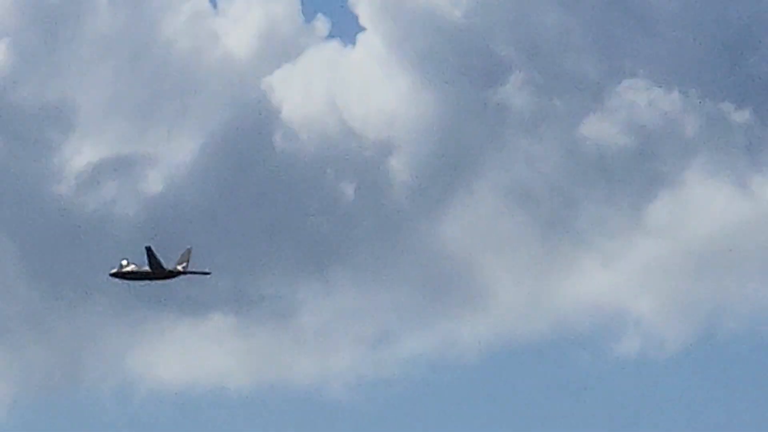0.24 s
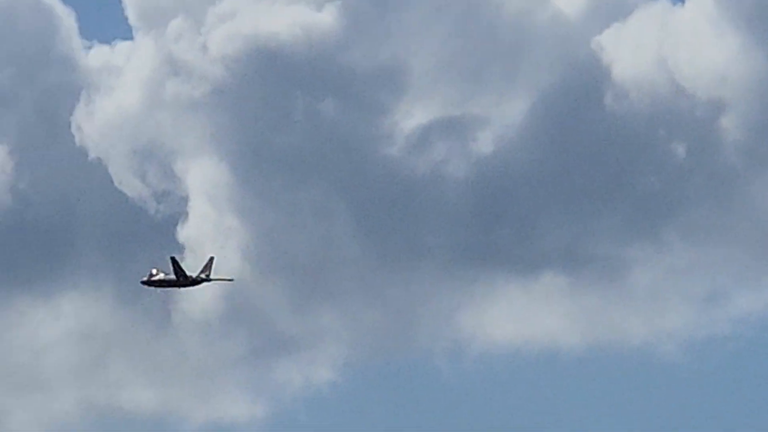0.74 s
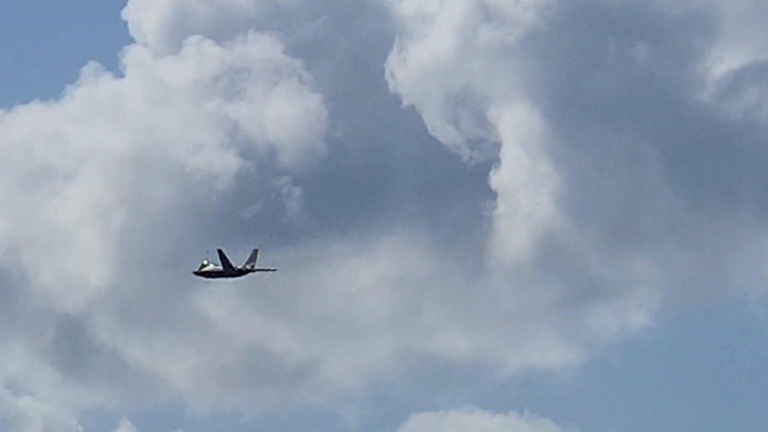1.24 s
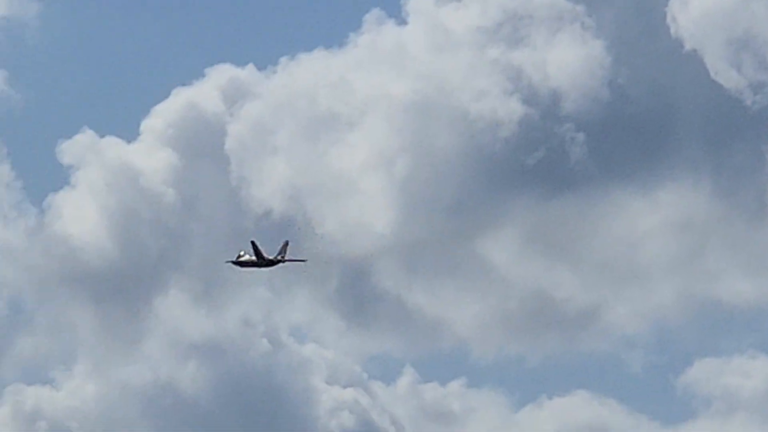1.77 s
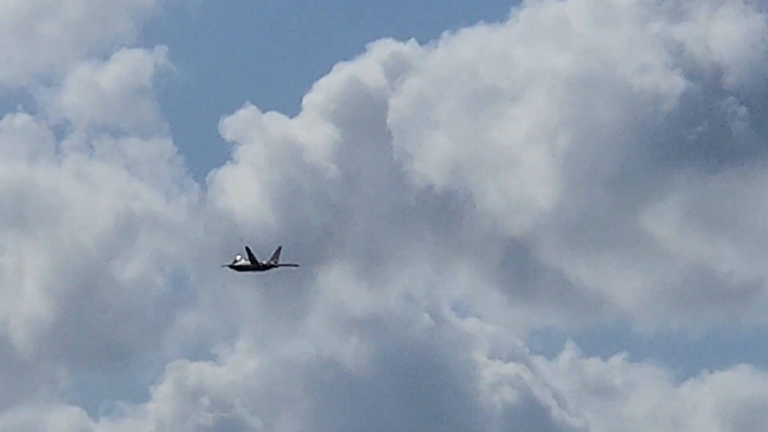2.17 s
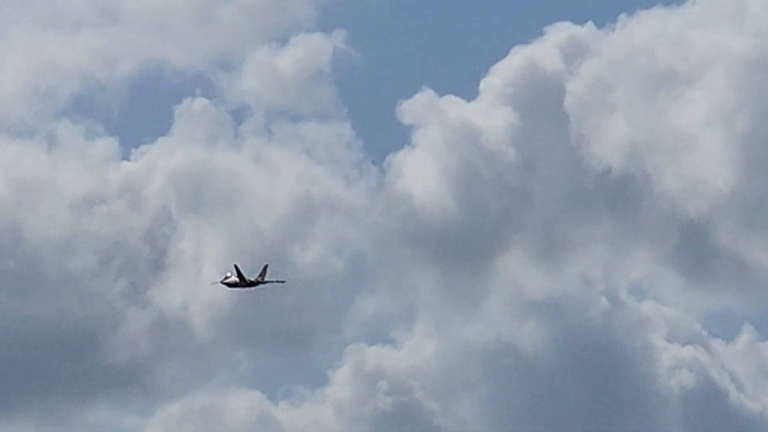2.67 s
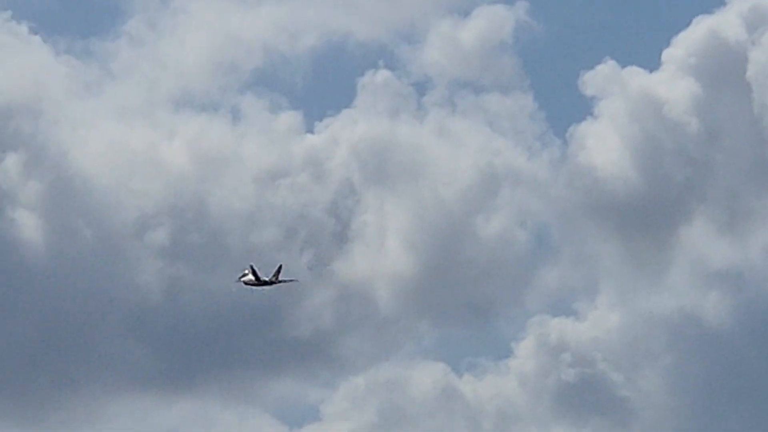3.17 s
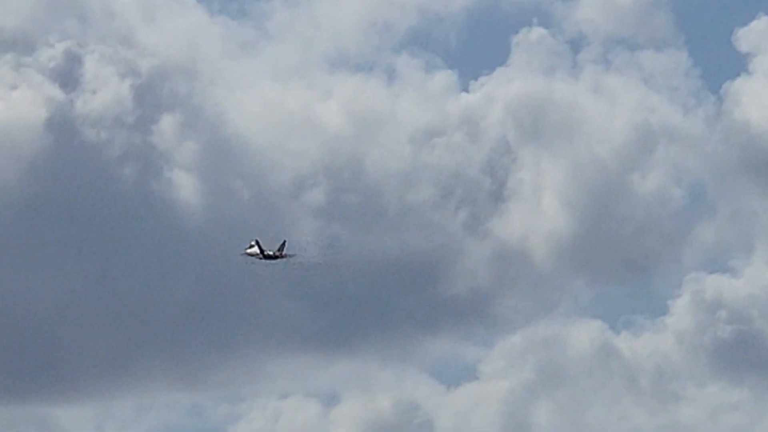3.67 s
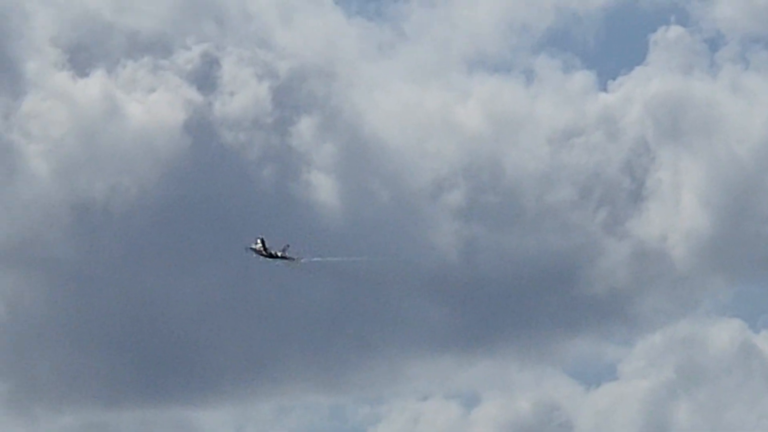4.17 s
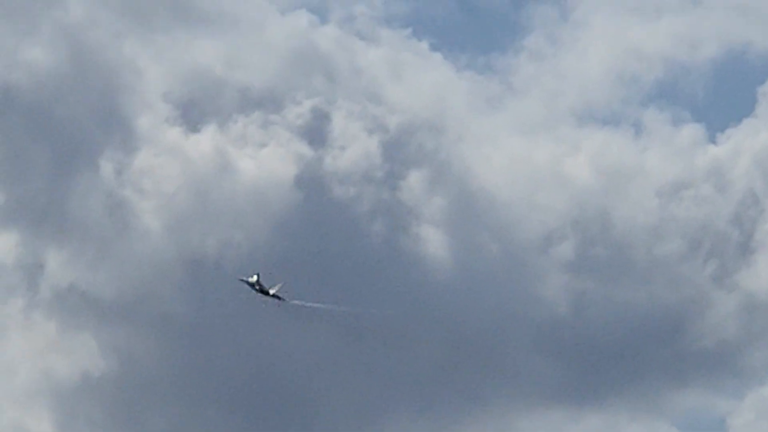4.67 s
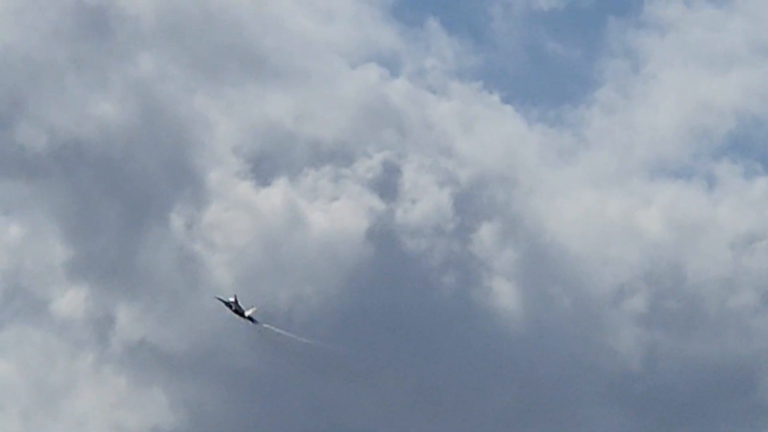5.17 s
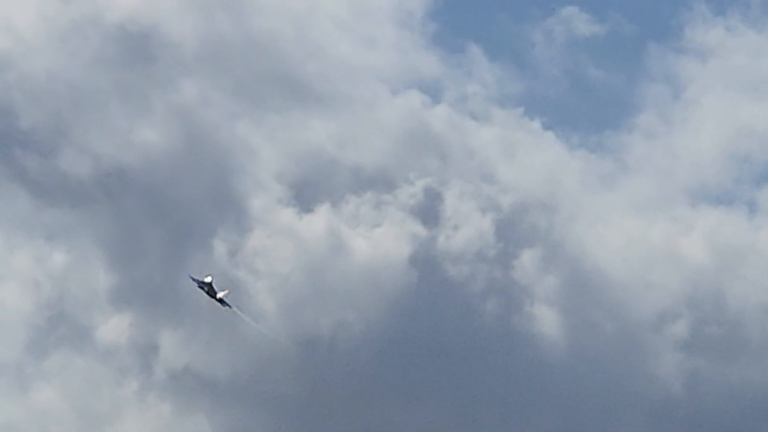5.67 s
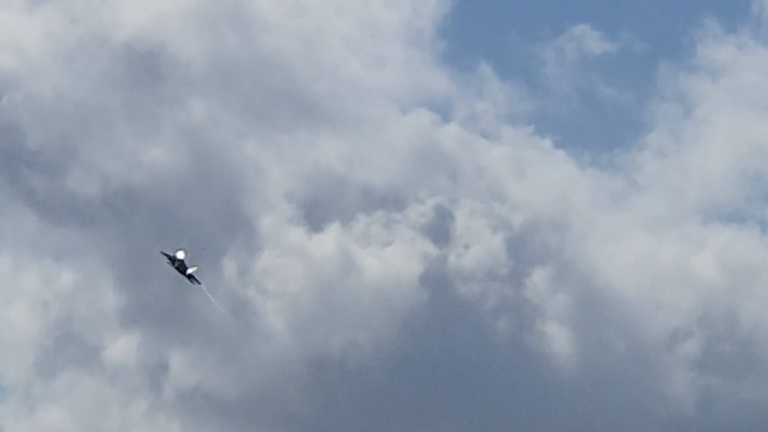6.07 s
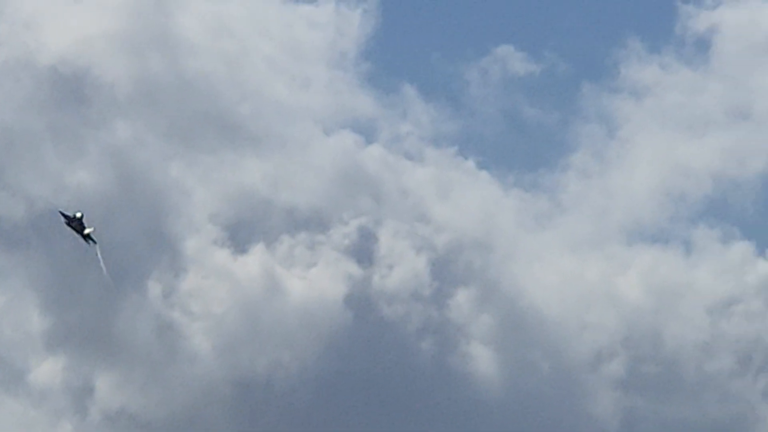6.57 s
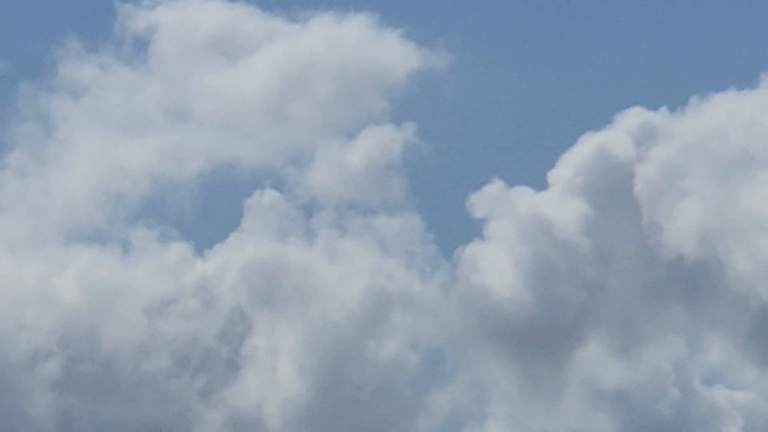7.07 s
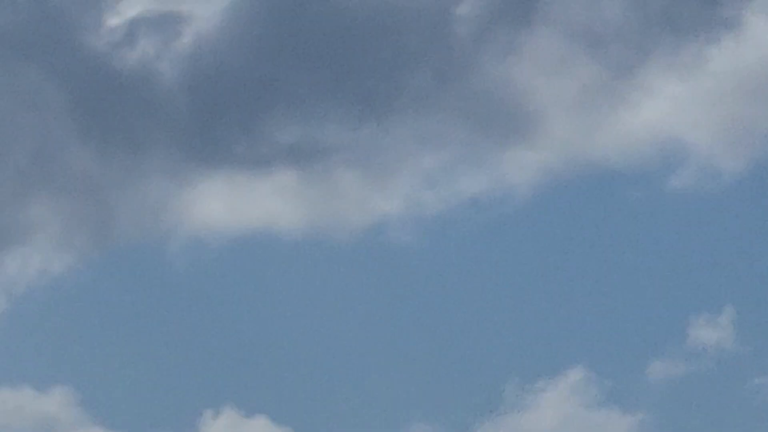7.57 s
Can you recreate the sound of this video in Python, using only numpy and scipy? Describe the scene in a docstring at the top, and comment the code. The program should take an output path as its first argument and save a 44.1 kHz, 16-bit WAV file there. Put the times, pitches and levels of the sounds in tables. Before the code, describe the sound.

Loud jet engine thunder fills the open sky, tearing and crackling sharply at first, then losing its hiss and becoming bassier with distance.

```python
"""A jet rumbles, roars and tears throughout, crackling most at the start, as a fighter flies away across the sky.
Five bands of shaped noise stand for the exhaust's eddies; noise roughened by random puffs makes the crackle.
Sharp noise bursts are the loudest shocks; distance dulls crackle and shocks, and faint thin ticks come late.
Echoes cancel or lift bands of the roar; two microphone ports hear the sound slightly apart, and a limiter
holds the peaks above a faint preamplifier hiss."""
import sys
import numpy as np
from scipy import signal
from scipy.fft import rfft, irfft, next_fast_len
from scipy.io import wavfile
from scipy.ndimage import uniform_filter1d, minimum_filter1d, map_coordinates

SR = 44100
rng = np.random.default_rng(int(sys.argv[2]) if len(sys.argv) > 2 else 0)


def master_out(mix):
    """Clip the mix to full scale and print it as 16-bit PCM to the path in sys.argv[1]."""
    frames = np.transpose(np.atleast_2d(mix))
    ceiling = np.clip(frames, -1, 1)
    pcm = np.round(ceiling * 32767).astype(np.int16)
    wavfile.write(sys.argv[1], SR, pcm)


N = 344851  # samples

# largest eddies of the exhaust plume: [t/s, rumble level/dB, growl level/dB]
PLUME = [(0, -13, -20), (.2, -11.5, -17.5), (.75, -14.5, -12), (1.25, -12, -15), (1.6, -13, -19.5),
         (2.05, -11.5, -15.5), (2.4, -10, -16), (2.8, -15, -12.5), (3.1, -9.5, -13), (3.5, -10, -14.5),
         (3.95, -13, -14), (4.1, -11, -14), (4.45, -13, -11), (4.9, -13, -16.5), (5.3, -9, -9.5),
         (5.7, -20, -14.5), (5.9, -23, -15.5), (6.2, -19, -10.5), (6.55, -15, -10), (6.8, -17, -11),
         (7.05, -15, -21), (7.3, -20.5, -18), (7.5, -17.5, -21), (7.8, -17.5, -25.5)]
# middle-sized eddies: [t/s, roar level/dB, howl level/dB]
CORE = [(0.0, -11, -44), (0.11, -25.5, -26), (0.24, -20, -25.5), (0.82, -19.5, -18.5), (0.89, -17.5, -31.5),
        (1.11, -19.5, -14), (1.15, -18, -38), (1.26, -20.5, -40), (1.54, -16.5, -33), (1.56, -24.5, -30),
        (1.82, -16.5, -39), (1.87, -21, -26), (1.93, -16.5, -40), (2.11, -16, -20), (2.24, -16, -36),
        (2.39, -19.5, -36), (2.47, -14.5, -26), (2.71, -22.5, -21), (2.78, -12, -26.5), (2.91, -16.5, -36),
        (3.19, -22, -18.5), (3.48, -17, -19.5), (3.52, -14.5, -29.5), (3.95, -18, -18), (4.02, -18, -29.5),
        (4.36, -18, -40), (4.45, -20.5, -18.5), (4.63, -20.5, -21.5), (4.95, -18.5, -18.5),
        (5.08, -23.5, -30), (5.24, -20, -31), (5.52, -33, -19.5), (5.65, -25.5, -31.5), (5.91, -19, -21.5),
        (6.1, -24.5, -22.5), (6.21, -21.5, -35), (6.65, -17, -15.5), (6.8, -19, -40), (7.0, -13.5, -23),
        (7.23, -17, -16.5), (7.3, -17.5, -25), (7.45, -14, -28), (7.49, -13, -13.5), (7.8, -12.5, -35)]
# thin shear layer of the exhaust: [t/s, tear level/dB, hiss level/dB]
SHEAR = [(0, -30, -40), (.3, -29.5, -49.5), (.6, -29, -49), (1, -28.5, -47.5), (1.22, -28.5, -51.5),
         (1.6, -26.5, -51.5), (2.4, -28, -57.5), (3, -29.5, -61), (3.6, -28.5, -60.5), (4.2, -27, -59),
         (4.9, -28.5, -63), (5.6, -29.5, -68.5), (6.3, -27.5, -67), (6.9, -24.5, -67.5),
         (7.3, -26.5, -76.5), (7.8, -28, -64)]
# where one size of eddy hands over to the next: [f/Hz]
EDGES_HZ = [165, 366, 630, 888]
# spectrum of the whole roar, relative density: [f/Hz, level/dB]
ROAR = [(13, -35), (25, -12), (70, 11.5), (130, -8.5), (217, 3), (335, -7.5), (550, -10), (900, -24),
        (1450, -29.5), (2060, -34.5), (3050, -43), (4000, -52.5), (5500, -81.5), (8000, -98), (16000, -130)]
# random wander of rumble, growl, roar, howl and tear, rms at the knots: [level/dB]
SWAY_DB = [1.2, 1.4, 0.67, 0.43, 0.5]
# bells in the rumble, the thuds: [t/s, half length t/s, change level/dB]
THUDS = [(.45, 0.071, 0), (1.45, 0.1, 2.5), (1.82, 0.031, -1.5), (2.35, 0.089, 0.5), (3.2, 0.035, -1),
         (3.4, 0.02, 6), (4.02, 0.036, 5.5), (4.94, 0.035, 6.5), (5.157, 0.013, 10), (5.205, 0.01, 5),
         (6.3, 0.025, 11), (6.54, 0.059, 6.5), (6.91, 0.016, 0), (7.47, 0.054, 9)]
# bells in the tearing: [t/s, half length t/s, tear change level/dB, hiss change level/dB, brightest f/Hz]
SURGES = [(0.097, 0.082, 7, 7, 1380), (0.471, 0.066, 8.5, 9, 1340), (0.716, 0.038, 9.5, 14.5, 1250),
          (0.849, 0.048, 6.5, 6.5, 1400), (1.024, 0.064, 3.5, 6, 1050), (1.358, 0.059, 5.5, 7.5, 1500),
          (1.76, 0.033, 1.5, 0, 1440), (2.007, 0.016, 3.5, 3, 2070), (2.213, 0.077, 4.5, 6.5, 1440),
          (2.5, 0.065, 3, 1.5, 2010), (2.689, 0.12, 7.5, 12, 1665), (3.096, 0.074, 3.5, 3, 1040),
          (3.309, 0.091, 7, 11, 1226), (3.471, 0.021, 3, 12, 1040), (4.033, 0.069, 5, 7.5, 1275),
          (4.457, 0.037, 6, 11, 1080), (5.117, 0.067, 1.5, 2, 2190), (6.045, 0.097, 5.5, 3, 2430),
          (6.654, 0.055, 3.5, -0.5, 1280), (6.808, 0.036, 2.5, -6, 1385), (7.023, 0.045, 3, -0.5, 1300),
          (7.562, .05, 1.5, 2, 1064)]
# bands that swell or sink for a while: [t/s, half length t/s, level/dB, width/octaves, f/Hz]
LOBES = [(.2, 0.18, -5.5, 0.054, 1600), (1.3, 0.64, -8.5, 0.066, 1108), (0.95, 0.23, -10, 0.14, 900),
         (1.43, 0.22, 11, .05, 1030), (1.5, .3, -7.5, 0.097, 1123), (0.075, 0.1, 1.5, .12, 1200),
         (0.056, 0.07, 9, .09, 1800), (.1, 0.084, 0.5, 0.046, 2250), (.1, .1, 5, .05, 2760),
         (.49, .06, 5.5, 0.085, 1530), (0.54, .05, 3, .05, 2500), (0.39, .1, 0, .2, 3900),
         (0.336, .015, 12, .3, 1100), (0.24, .015, 5, .2, 950), (1.1, 0.012, 5.5, 0.32, 950),
         (1.1, .07, 5, .04, 1700), (0.58, .05, 9, .1, 1280), (.75, 0.12, 7, 0.086, 760),
         (1.7, .25, -6.5, 0.055, 600), (2.5, .2, -9.5, .04, 700), (2.2, 0.13, 5.5, .07, 560),
         (3.1, 0.14, 4, 0.32, 430), (2.55, .15, 6, .06, 560), (2.15, 0.13, 5.5, .05, 1000),
         (3.37, .12, 8.5, .06, 1030), (3.65, .08, -4.5, 0.11, 1050), (4.07, 0.053, 5, .15, 2400),
         (3.05, .1, 3.5, .1, 2050), (3.75, .08, 2.5, .15, 2100), (2.7, .08, 6.5, .04, 1900),
         (4.65, 0.22, 3, .12, 215), (5.45, .05, 4.5, .4, 140), (7.15, .15, 2.5, .08, 580),
         (7.55, .15, 3, .1, 520), (6.1, .4, -4, .2, 115), (2.3, .4, -3, .2, 107), (3.3, .1, 4, .06, 1220),
         (3.35, .12, -6.5, .05, 1580), (3.33, .12, 5.5, 0.076, 2250), (2.9, .25, -5.5, .06, 900),
         (3.95, 0.081, 3, .2, 560), (5.38, 0.17, 8.5, .14, 340), (5.85, 0.17, -8.5, 0.078, 440),
         (5.9, .12, 3, .1, 580), (5.85, .08, 4.5, 0.13, 240), (6.7, 0.16, 8.5, 0.065, 2900),
         (6.62, .06, 2.5, .04, 3450), (2.7, .09, 4, 0.22, 2350), (5.12, 0.045, 6, 0.19, 2150),
         (3.2, .12, 7.5, .07, 800), (2.72, .1, 5, .07, 830), (3.8, .08, 5, 0.074, 760),
         (3.95, .06, 3, .08, 820), (4.8, .2, -5.5, .06, 1040), (2.4, .15, -3.5, .08, 1050),
         (1.235, 0.044, -4.5, 0.36, 2000), (6.2, .4, -1, .1, 1900), (6.9, .2, 4.5, .06, 1800),
         (7.2, .6, -6, 0.036, 3000), (6.7, 0.13, 5, .3, 1300), (0.46, .3, -5.5, 0.055, 1750),
         (1.6, 0.4, -7.5, 0.045, 1820), (2.7, 0.25, 3, 0.046, 560), (2.8, 0.83, -8, 0.15, 232.6),
         (4.2, 0.11, 3.5, 0.15, 430), (2.6, 0.13, 7, .07, 1040), (4.9, 0.12, 9, 0.058, 640),
         (3.9, 0.12, 5, 0.099, 700), (3.3, 0.12, 4, 0.057, 720), (.8, .15, 2, .08, 580),
         (5.09, 0.014, 14, 0.2, 205), (5.03, .012, 5.5, 0.2, 290), (6.75, .15, 0.5, 0.35, 2400),
         (3.7, 0.37, 4.5, 0.18, 280), (4.5, .15, 5, 0.089, 640), (6.5, 0.45, 3, .3, 70),
         (1.1, .4, -6, .4, 39), (3.8, 0.27, 4, .15, 1700), (5.8, 0.18, 3, 0.11, 360),
         (2.3, 0.18, 4, .08, 660), (2.3, 1, 5.5, 0.16, 177), (3.35, .15, 3.5, 0.037, 1600),
         (2.7, 0.27, -9.5, 0.052, 1330), (2.3, 0.27, -8.5, 0.036, 650), (3.846, 0.34, 9, 0.084, 396),
         (3.902, 0.25, -8.5, 0.14, 1400), (4.3, 0.54, -6.5, 0.095, 875), (4.5, 0.71, 6.5, 0.055, 1034),
         (4.57, 0.15, 6, .25, 236), (5.9, .6, -8.5, 0.089, 1677), (7, 0.16, 4.5, 0.07, 2050),
         (6.98, 0.4, 6.5, 0.13, 588), (7.7, .2, 11, 0.13, 450), (6.75, 0.064, 4.5, 0.024, 1050),
         (7.9, 0.14, 11, 0.041, 1200), (9.1, .08, 3, .05, 1050), (7, 0.54, -6.5, 0.079, 1700),
         (7.83, 0.34, 11.5, 0.32, 3320)]
# the bass drops out and comes back: [start t/s, back t/s, depth level/dB, f/Hz where half the depth is left]
DROPS = [(4.983, 5.209, 10, 418), (4.985, 5.14, 7.5, 140), (5.521, 5.655, 9, 397), (6.11, 6.15, 11.5, 297),
         (7.204, 7.315, 4, 302)]
# bands that echoes cancel or lift: [f/Hz, width f/Hz, jet abeam level/dB, jet far off level/dB]
BANDS = [(235, 15, -8, 2), (332, 32, -1, -6), (440, 72, 3.5, -7), (568.4, 6.8, 0, 4), (708, 59, -4.5, -0.5),
         (805, 15, 2.5, 0.5), (920, 31, -5.5, -6), (1025.5, 19, 7.5, 6), (1150, 120, -3.5, 0.5),
         (1430, 180, 0.5, 4.5), (1750, 90, -3.5, 0), (1930, 235, 2, 6), (2440, 210, -0.5, 0.5),
         (2800, 80, -10, 1), (3570, 500, 1.4, -7)]
# spectrum of the hiss, relative density: [f/Hz, level/dB]
HISS = [(2000, -48), (3200, -12), (3900, -11), (4700, -4.5), (5400, -5), (6000, -15), (6700, -18.5),
        (7500, -14), (8100, -24.5), (8500, -34), (9500, -44), (11000, -41), (12200, -37), (13500, -44),
        (15500, -58.5)]
# spectrum of a sharp shock, relative density: [f/Hz, level/dB]
CRACK = [(800, -29.5), (2000, 4.5), (3500, -6), (5000, 2), (6300, -6.5), (7500, -6), (8500, -19.5),
         (9500, -43.5), (16000, -70)]
# spectrum of a shock's top treble, relative density: [f/Hz, level/dB]
TIP = [(6000, -42.5), (8500, -4), (10000, -4.5), (12200, -0.5), (13500, -6), (15500, -17.5)]
# loudest shocks: [t/s, crack drive level/dB, top treble drive level/dB]
SHOCKS = [(0.023, -42, -55.5), (0.0329, -19, -47), (0.0827, -35, -58.0), (0.0985, -32, -53.5),
          (0.129, -40.5, -59.5), (0.164, -40, -59.5), (0.1739, -40.0, -60.5), (0.2156, -28, -73.5),
          (0.4231, -36.5, -54.5), (0.428, -31, -58), (0.437, -31, -52.5), (0.4468, -26, -50),
          (0.468, -28, -53.5), (0.475, -24.5, -53.5), (0.488, -30, -62), (0.5049, -37, -60),
          (0.528, -41, -53.5), (0.6052, -35, -59), (0.69, -24, -54.5), (0.7162, -33.0, -50.5),
          (0.728, -34, -46.5), (0.769, -27, -59), (0.809, -28, -59), (0.843, -32, -62.5), (0.855, -29, -57),
          (0.863, -25, -55.5), (0.925, -34, -61.5), (0.966, -35, -74), (1.0, -29, -61.5),
          (1.175, -32, -70.5), (1.2573, -41, -69.5), (1.2925, -37, -68.5), (1.315, -27, -57),
          (1.3663, -42, -71.0), (1.402, -32, -68.0), (1.98, -44, -84.5), (2.174, -37, -70.5),
          (2.184, -42, -67.5), (2.2618, -40, -78), (2.392, -48.0, -68.5), (2.518, -34, -66.5),
          (2.6215, -27, -69.5), (2.6734, -36.5, -63), (2.7293, -39, -71.5), (2.7753, -35, -65.5),
          (3.003, -57.0, -64), (3.256, -29, -54.5), (3.2748, -29, -58), (3.44, -47, -67.5),
          (3.8392, -53, -71.5), (3.888, -52.0, -67), (4.0238, -45, -71), (4.0637, -45, -67.5),
          (4.1, -31.5, -68.5), (4.345, -40, -82), (4.351, -52, -64), (4.4194, -41, -69.5),
          (4.443, -37, -68), (4.4623, -36.5, -64.0), (4.4759, -27, -59)]
# faint, thin ticks: [t/s, drive level/dB]
TICKS = [(4.6862, -68), (4.883, -68.5), (5.0328, -61.5), (5.2178, -62), (5.563, -59), (5.8786, -63),
         (5.9767, -63), (6.1251, -67), (6.3805, -65.5), (6.451, -61), (6.5504, -65.5), (6.588, -67),
         (6.816, -62), (6.9021, -65.5), (7.5, -61), (7.5701, -62), (7.6509, -54.5)]
# tilt that the air gives the treble: [t/s, fall from 0 Hz to 8 kHz level/dB]
AIR = [(0, 2), (.4, 0), (1, 6.5), (2, 14), (4, 21), (4.6, 16.5), (5, 19.5), (7.8, 25.5)]
# course of the jet: [t/s, share of the way from abeam to far off]
TURN = [(0, 0.24), (2.5, 0.17), (4.5, 0.66), (7.8, 1)]
# the two ports, jet abeam: [f/Hz, likeness, left over right level/dB]
ABEAM = [(40, 0.9, 3.5), (131, 0.65, 5), (261, 0.96, 1.5), (554, 0.99, -1), (790, 0.61, 1.5),
         (1240, 0.75, 3.5), (1710, 0.61, 5.5), (2030, .75, 3), (2450, 0.75, 1.5), (2900, 0.25, 0.5),
         (3500, 0.68, 3), (4830, 0.45, -7.5), (6200, 0.28, -5), (8000, 0.46, 6), (10300, .5, 0),
         (12000, 0.7, -7.5), (14000, .5, -2)]
# the two ports, jet far off: [f/Hz, likeness, left over right level/dB]
AFAR = [(39, 0.59, -2.5), (131, 0.99, 1.1), (253, 0.86, -1), (600, 0.93, -0.5), (840, .75, -3),
        (1290, 0.94, 0), (1690, 0.5, 3), (2040, 0.7, 3), (2450, 0.73, 2), (2900, 0.31, 4.5),
        (3480, 0.33, 6), (4800, 0.28, -6), (6200, .3, -1), (8000, 0.42, 6), (12000, .5, -1.5)]
# phase by which the left port leads: [f/Hz, abeam phase/rad, far off phase/rad]
LEAD = [(40, -.2, -.15), (600, -.25, -.1), (900, .1, .4), (1300, -.2, 1.2), (1650, 1.2, 2.4),
        (2000, 4.6, 5.6), (2700, 4.2, 5.4), (3500, 3.6, 5.2), (4100, 3.2, 3.8), (4800, 3.2, 6.1),
        (7500, 3.2, 6.2), (9500, 5, 6.3), (16000, 5, 6.3)]
# spectrum of the preamplifier's hiss, relative density: [f/Hz, level/dB]
SELF_NOISE = [(3000, -12), (6500, -9), (9000, -11), (10500, -7), (12000, 0), (13500, -2), (15800, -9)]

SIZE, HOP = 1024, 256  # samples per spectral frame and between frames
HZ = np.fft.rfftfreq(SIZE, 1 / SR)[:, None]
HISS_SWAY_DB = 1.5  # rms at the knots
SHOCK_FALL_S, SHOCK_TAIL_S, TAIL_SHARE = 0.0025, 0.012, 0.3  # the crack, then a softer tearing tail
TICK_FALL_S = 0.0014
FLUTTER_DB, NARROW_DB = 1.1, 1.7  # broad, quick patches and narrow ones, before weighting by frequency
FAR_CALM = 0.6  # share of the flutter that distance smooths away
PEAK_SHARE, PEAK_OCTAVES = 0.71, 0.11  # extra share of a surge at its brightest pitch, and its width
KNEE, QUIET_GAIN = 6, 1.03  # limiter: sharpness of the knee, gain well below it
SELF_DB, TOP_HZ = -79.5, 15830  # rms of the preamplifier hiss before the band limit, and that limit


def amp(db):
    """Decibels to gain."""
    return 10 ** (np.asarray(db) / 20)


def unit(x):
    """Scaled to rms 1."""
    return x / np.sqrt(np.mean(np.abs(x) ** 2) + 1e-30)


def along(points):
    """Each column after the frequency, read on a log axis at every bin."""
    f, *cols = np.transpose(points)
    return [np.interp(np.log(HZ + 1), np.log(f + 1), col) for col in cols]


def curves(rows, t):
    """Each column after the time, read at times t."""
    s, *cols = np.transpose(rows)
    return [np.interp(t, s, col) for col in cols]


def bumps(rows, t):
    """One bell-shaped change in dB per row."""
    return [db * np.exp(-.5 * ((t - s) / half) ** 2) for s, half, db, *_ in rows]


def banded(rows, t, octaves):
    """The bells, each kept to a band around the row's last column (Hz)."""
    total = 0
    for bell, row, wide in zip(bumps(rows, t), rows, octaves):
        total = total + bell * np.exp(-.5 * (np.log2((HZ + 1) / row[-1]) / wide) ** 2)
    return total


def wander(count, rate, t):
    """Smooth random curves, rate knots a second."""
    knots = rng.standard_normal((count, 200))
    return np.array([map_coordinates(row, [t * rate], mode="nearest") for row in knots])


def patches(shape, bins, frames):
    """A smooth random field over frequency and time, rms 1: turbulent air bends the sound in patches."""
    field = rng.standard_normal(shape)
    for _ in range(2):
        field = uniform_filter1d(uniform_filter1d(field, bins, axis=0), frames, axis=1)
    return unit(field)


def puffs(spikes, rise, fall):
    """Each spike becomes a sudden rise and a short exponential fall (s)."""
    t = np.arange(SR // 20) / SR
    puff = (1 - np.exp(-t / rise)) * np.exp(-t / fall)
    return signal.fftconvolve(spikes, [puff], axes=1)[:, :N]


def dulled(spectrum, t):
    """Air takes the treble as the path grows: the tilt pivots near 5.7 kHz, with rms 1 at the start."""
    gain = amp(along(spectrum)[0] - curves(AIR, t)[0] * ((HZ / 8000) ** 2 - 0.5068))
    return gain / np.sqrt(np.mean(gain[:, 0] ** 2))


def heard(sources, colour):
    """Noise shared by both ports plus noise of their own, coloured, with level and phase between them."""
    _, t, (shared, *own) = signal.stft(sources, SR, nperseg=SIZE, noverlap=SIZE - HOP)
    way = np.clip(curves(TURN, t)[0], 0, 1)
    ends = [*zip(along(ABEAM), along(AFAR)), along(LEAD)]
    alike, pan_db, lead = [near + (far - near) * way for near, far in ends]
    alike = np.clip(alike, 0, 1)
    gain = colour(t)
    ports = []
    for side, alone in zip((1, -1), own):  # left, right
        common = np.sqrt(alike) * np.exp(1j * side * lead / 2) * shared
        mix = common + np.sqrt(1 - alike) * alone
        ports.append(gain * amp(side * pan_db / 2) * mix)
    return signal.istft(np.array(ports), SR, nperseg=SIZE, noverlap=SIZE - HOP)[1][:, :N]


def preamp_hiss():
    """The preamplifier's own hiss: steady shaped noise, independent in each channel."""
    m = next_fast_len(N + SR // 2)
    hz = np.fft.rfftfreq(m, 1 / SR)
    f, db = np.transpose(SELF_NOISE)
    shape = amp(np.interp(np.log(hz + 1), np.log(f), db))
    hiss = irfft(rfft(rng.standard_normal((2, N)), m) * shape, m)[:, :N]
    return amp(SELF_DB) * unit(hiss)


def ticks():
    """Very short, broad clicks: bursts of noise centred on 10 kHz."""
    spikes = np.zeros((1, N))
    for s, db in TICKS:
        spikes[0, round(s * SR)] = amp(db)
    thin = puffs(spikes, rise=.0001, fall=TICK_FALL_S)
    return heard(thin * rng.standard_normal((3, N)),
                 lambda t: unit(np.exp(-.5 * ((HZ - 10000) / 3000) ** 2)))


def shocks():
    """The loudest shocks: sudden noisy cracks with softer tails, some reaching far into the treble."""
    spikes = np.zeros((2, N))
    for s, *db in SHOCKS:
        spikes[:, round(s * SR)] = amp(db)
    sharp = puffs(spikes, rise=0.00014, fall=SHOCK_FALL_S)
    tail = puffs(spikes, rise=.002, fall=SHOCK_TAIL_S)
    crack, tip = sharp + TAIL_SHARE * tail
    body = heard(crack * rng.standard_normal((3, N)), lambda t: dulled(CRACK, t))
    treble = heard(tip * rng.standard_normal((3, N)), lambda t: unit(amp(along(TIP)[0])))
    return body + treble


def hiss_colour(t):
    """Hiss dulled by distance and heard through broad and narrow patches of air."""
    gain = dulled(HISS, t)
    broad_db = 0.66 * patches(gain.shape, bins=25, frames=6)
    narrow_db = 3.1 * patches(gain.shape, bins=4, frames=14)
    return gain * amp(broad_db + narrow_db)


def crackle():
    """Hiss roughened by a hail of small shocks, about 400 a second, of random strength."""
    t = np.arange(N) / SR
    hail = (rng.random((1, N)) < 400 / SR) * amp(3.26 * rng.exponential(size=(1, N)))
    hiss_surges = [(s, half, db) for s, half, _, db, _ in SURGES]
    level_db = curves(SHEAR, t)[1] + sum(bumps(hiss_surges, t))
    level_db = level_db + HISS_SWAY_DB * wander(count=1, rate=24, t=t)
    rough = unit(0.9 + puffs(hail, rise=.0002, fall=0.0018)) * amp(level_db)
    return heard(rough * rng.standard_normal((3, N)), hiss_colour)


def drop_db(t):
    """A low shelf that falls abruptly and recovers more slowly."""
    def gate(s, blur):
        return .5 + .5 * np.tanh((t - s) / blur)
    return sum(-db * (gate(start, 0.003) - gate(back, 0.017)) / (1 + (HZ / hz) ** 4)
               for start, back, db, hz in DROPS)


def eddy_power(t):
    """Five sizes of eddy, each with its share of the spectrum and its own moving level."""
    steps = [1 / (1 + (edge / (HZ + 1)) ** 8) for edge in EDGES_HZ]
    shares = -np.diff([np.ones_like(HZ), *steps, np.zeros_like(HZ)], axis=0)
    rumble, growl = curves(PLUME, t)
    rumble = rumble + sum(bumps(THUDS, t))
    tear = curves(SHEAR, t)[0] + sum(bumps(SURGES, t))
    levels = np.array([rumble, growl, *curves(CORE, t), tear])
    levels = levels + np.reshape(SWAY_DB, (-1, 1)) * wander(count=5, rate=12, t=t)
    spectrum = amp(along(ROAR)[0])
    return sum(unit(spectrum * np.sqrt(np.abs(share))) ** 2 * amp(2 * db)
               for share, db in zip(shares, levels))


def roar_colour(t):
    """The eddies' sound through bass drops, echoes, swelling bands and patchy air."""
    power = eddy_power(t)
    way = curves(TURN, t)[0]
    echo_db = sum((near + (far - near) * way) * np.exp(-.5 * ((HZ - hz) / width) ** 2)
                  for hz, width, near, far in BANDS)
    peak_db = PEAK_SHARE * banded(SURGES, t, [PEAK_OCTAVES] * len(SURGES))
    lobe_db = banded(LOBES, t, [row[3] for row in LOBES])
    # long waves scatter little
    narrow_db = NARROW_DB * patches(power.shape, bins=2, frames=14) * np.clip(HZ / 1000, .15, 1)
    flutter_db = FLUTTER_DB * patches(power.shape, bins=40, frames=4) * np.clip(HZ / 1500, .2, 1.6)
    flutter_db = flutter_db * (1 - FAR_CALM * way)
    return np.sqrt(power) * amp(drop_db(t) + echo_db + peak_db + lobe_db + narrow_db + flutter_db)


def roar():
    """Mixing noise of the exhaust: white noise coloured by the eddies and the path."""
    return heard(rng.standard_normal((3, N)), roar_colour)


def scene():
    """The jet's roar, crackle and shocks, with faint thin ticks added."""
    return ticks() + shocks() + crackle() + roar()


def record(dry):
    """A fast soft-kneed limiter per channel, the preamplifier's hiss, then the band limit."""
    need = QUIET_GAIN * (1 + np.abs(dry) ** KNEE) ** (-1 / KNEE)
    gain = minimum_filter1d(need, size=161, axis=1)  # ducks just before and after each peak
    for _ in range(2):
        gain = uniform_filter1d(gain, size=81, axis=1)
    mix = np.clip(dry * gain, -1, 1) + preamp_hiss()
    m = next_fast_len(N + SR // 2)
    hz = np.fft.rfftfreq(m, 1 / SR)
    return irfft(rfft(mix, m) * (hz < TOP_HZ), m)[:, :N]


dry = scene()
out = record(dry)
master_out(out)
```